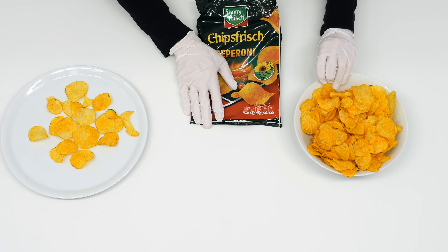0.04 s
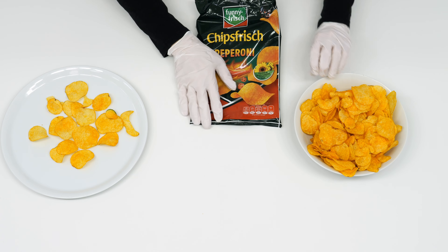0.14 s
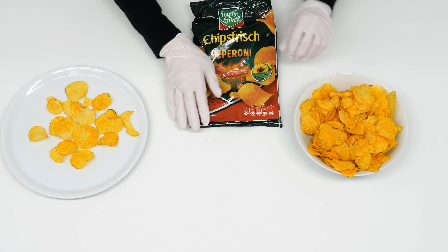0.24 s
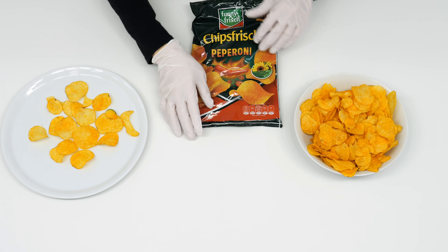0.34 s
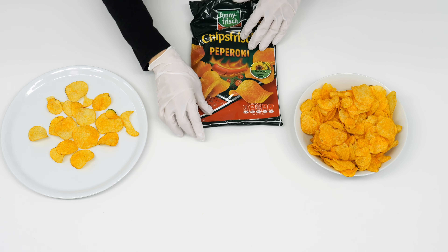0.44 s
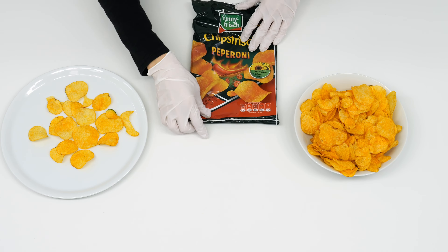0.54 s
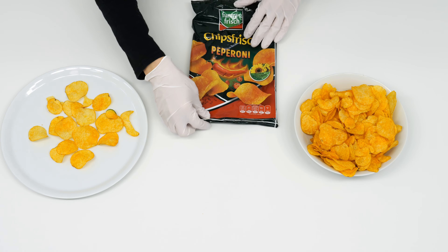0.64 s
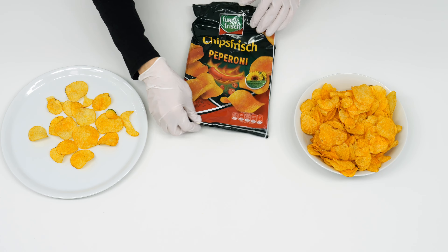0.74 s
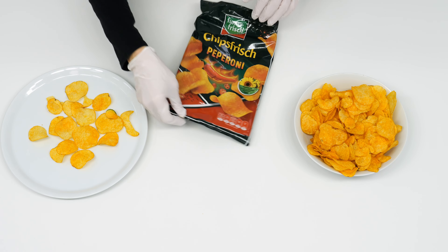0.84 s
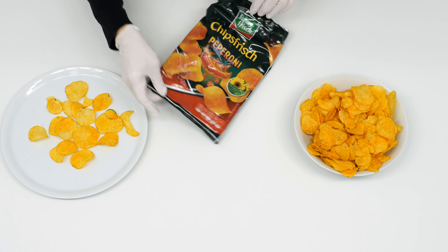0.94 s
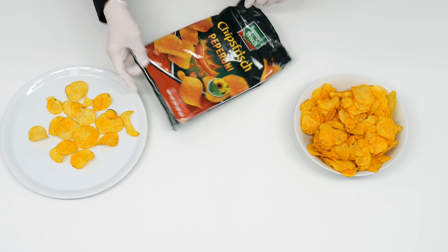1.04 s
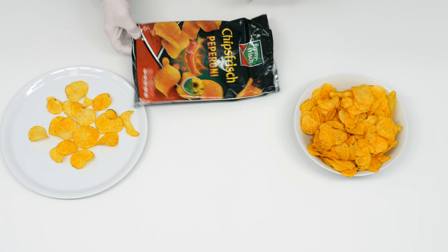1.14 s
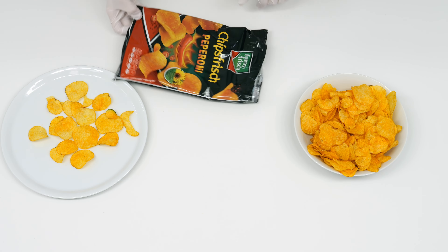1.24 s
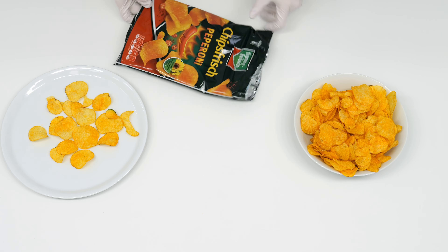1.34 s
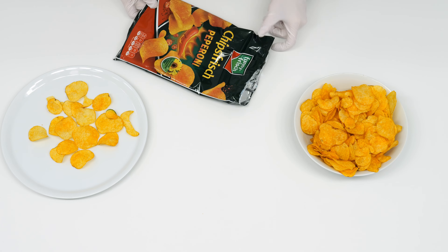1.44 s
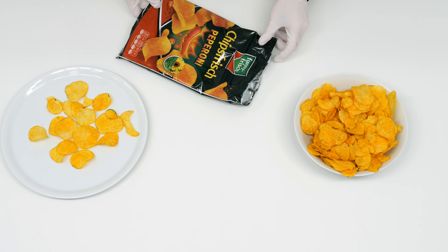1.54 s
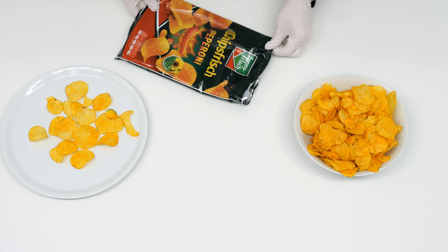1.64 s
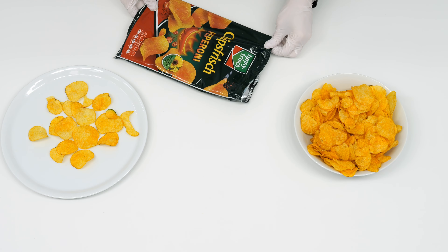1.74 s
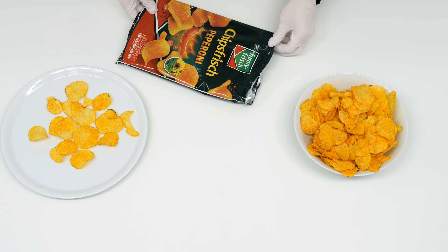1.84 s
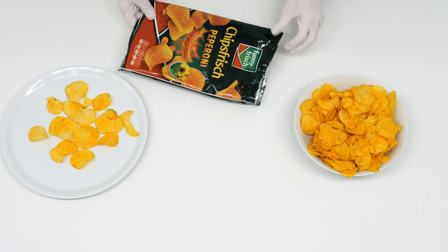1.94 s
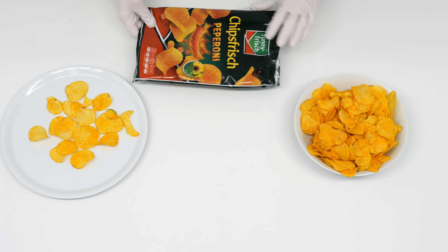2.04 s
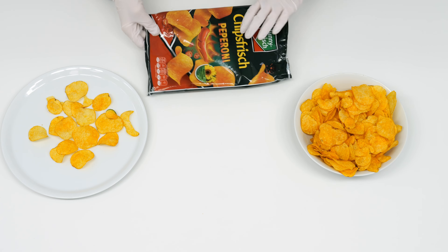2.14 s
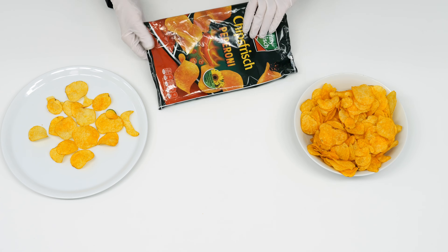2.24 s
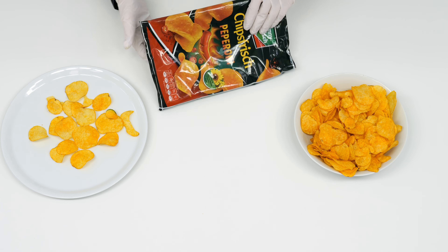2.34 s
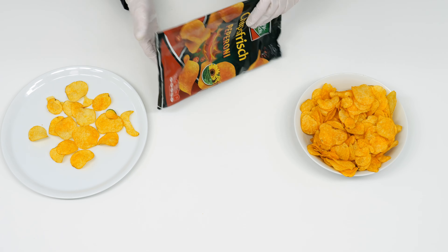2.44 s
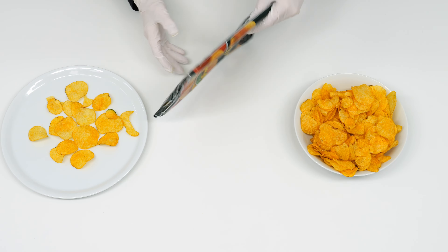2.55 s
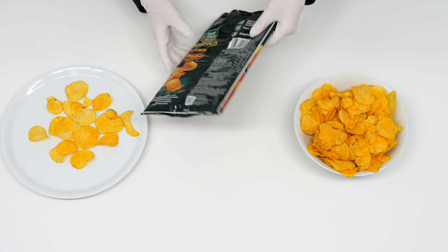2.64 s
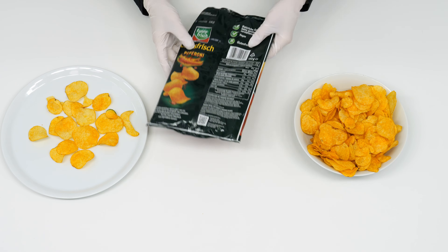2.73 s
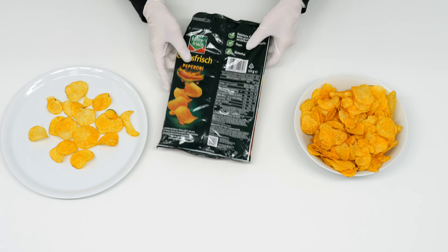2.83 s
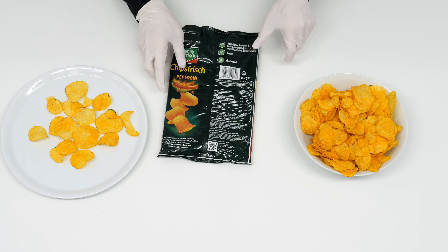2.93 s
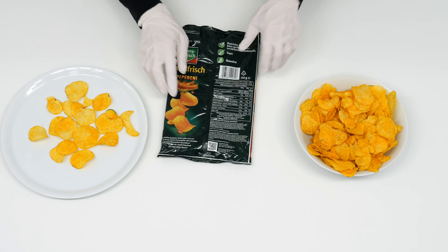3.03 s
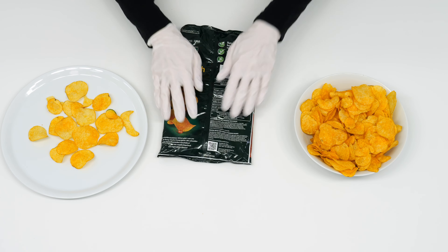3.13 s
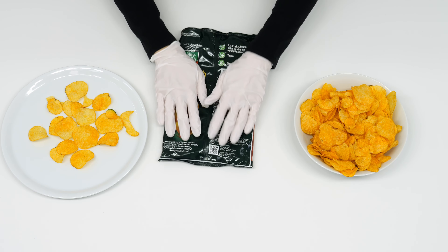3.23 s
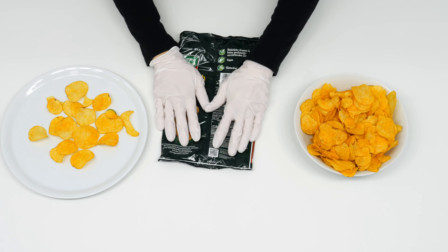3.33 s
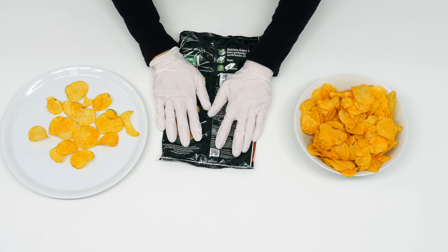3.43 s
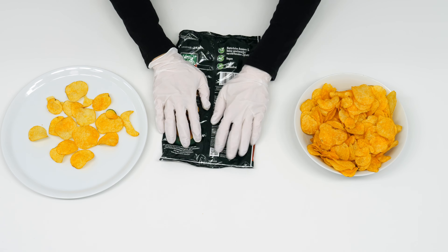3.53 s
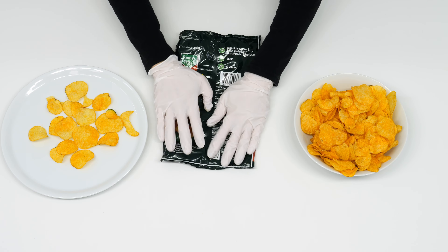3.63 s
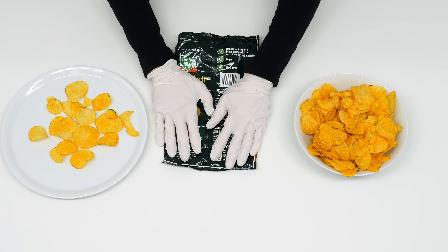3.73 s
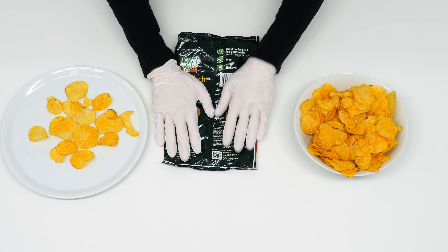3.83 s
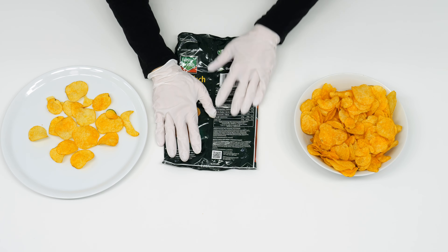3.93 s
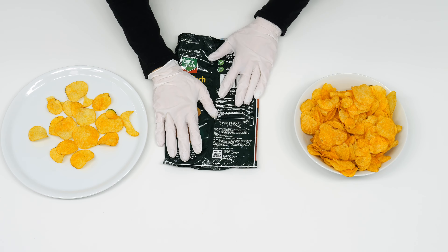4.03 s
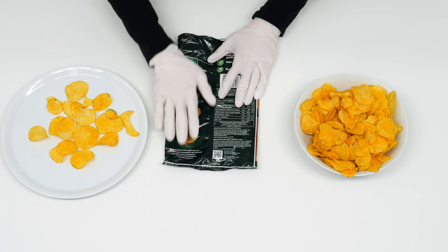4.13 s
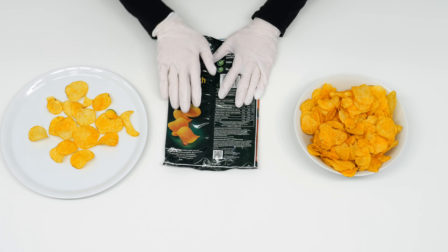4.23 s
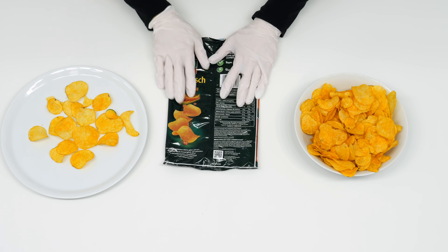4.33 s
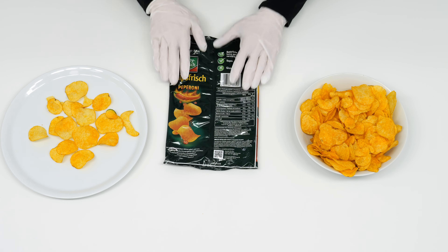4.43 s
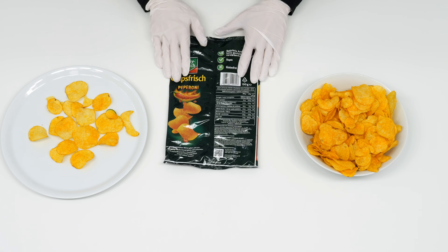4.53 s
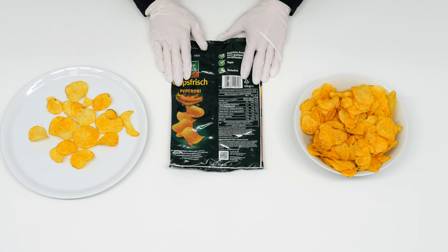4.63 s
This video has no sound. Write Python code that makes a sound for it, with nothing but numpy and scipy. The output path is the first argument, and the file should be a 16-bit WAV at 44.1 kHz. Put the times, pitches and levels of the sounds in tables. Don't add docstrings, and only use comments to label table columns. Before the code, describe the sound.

Thin plastic film crinkles close to a stereo pair of microphones indoors. First come loose, irregular snaps and dull knocks while the bag is handled and flipped, then a brief lull, then louder, brighter, tightly packed crackling with low table thuds as it is smoothed. The activity drops abruptly to near silence, with isolated tiny clicks from resting fingertips and a small late flurry.

```python
import sys
import numpy as np
from scipy import signal
from scipy.io import wavfile

SR = 44100
rng = np.random.default_rng(int(sys.argv[2]) if len(sys.argv) > 2 else 0)


def dump(signal):
    limited = np.clip(np.atleast_2d(signal).T, -1, 1)
    pcm = np.round(limited * 32767).astype(np.int16)
    wavfile.write(sys.argv[1], SR, pcm)


def boost(x):
    u = np.asarray(x, float) / 20
    return 10 ** u


N = 355446


def rms_one(x):
    return x / np.sqrt(np.mean(x ** 2) + 1e-20)


def peak_one(rows):
    return rows / (np.abs(rows).max(axis=1, keepdims=True) + 1e-12)


def wall_gain(db):
    return boost(np.array([[0], [0], [db]]))


def in_time(curve):
    s, value = np.transpose(curve)
    return np.interp(np.arange(N) / SR, s, value)


def at_hz(points, hz):
    table_hz, value = np.transpose(points)
    return np.interp(np.log(hz), np.log(table_hz), value)


def band(x, low_hz, high_hz):
    edges = [low_hz, min(high_hz, 0.45 * SR)]
    return signal.sosfilt(signal.butter(2, edges, "band", fs=SR, output="sos"), x)


def trail(x, lag_s):
    r = np.exp(-1 / (lag_s * SR))
    return signal.lfilter([1 - r], [1, -r], x)


def drift(rate_hz):
    r = np.exp(-80 * np.pi * rate_hz / SR)
    slow = signal.lfilter([1], [1, -2 * r, r * r], rng.standard_normal(N // 40 + 2002))[2000:]
    return np.interp(np.arange(N) / 40, np.arange(len(slow)), rms_one(slow))


BAND_EDGES_HZ = 30 * 2 ** np.arange(0, 9.6, 0.5)
# (frequency [Hz], likeness [0-1])
LEFT_RIGHT_LIKENESS = [(100, 0.76), (500, 0.29), (1500, 0.31), (4000, 0.11), (14000, 0.026)]


def noise_bands(size):
    white = rng.standard_normal((2, 2, size))
    for k, (low, high) in enumerate(zip(BAND_EDGES_HZ, BAND_EDGES_HZ[1:])):
        centre_hz = np.sqrt(low * high)
        mid, side = band(white[k % 2], low, high)
        alike = np.clip(at_hz(LEFT_RIGHT_LIKENESS, centre_hz), 0, 1)
        yield centre_hz, np.sqrt(1 + alike) * mid + np.sqrt(1 - alike) * side * [[1], [-1]]


def hiss(colour, patchy_db):
    noise = sum(boost(at_hz(colour, hz)) * x for hz, x in noise_bands(N))
    return rms_one(noise) * boost(patchy_db * drift(20))


def low_noise(low_hz, high_hz, side_share):
    mid, side = band(rng.standard_normal((2, N)), low_hz, high_hz)
    return mid + side_share * side * [[1], [-1]]


# (time [s], hold [s], crackle level [dB])
GRIPS = [(0.122, .05, -47), (0.186, .11, -45), (.367, .07, -39), (0.442, .15, -30), (.62, .2, -36),
         (0.881, .06, -36), (1.075, .04, -39), (1.182, .01, -37.5), (1.266, .02, -36), (1.399, .05, -34),
         (1.633, .02, -36), (1.662, .015, -26.5), (1.685, .005, -15), (1.877, .1, -31), (1.999, .06, -37),
         (2.178, .015, -36.5), (2.257, .055, -27.5), (2.398, .08, -36), (2.555, .07, -38),
         (2.736, .04, -42), (2.8, .2, -38.5), (3.238, .07, -34), (3.309, .04, -30.5), (3.356, .045, -24.5),
         (3.501, .1, -29), (3.667, .02, -20), (3.726, .015, -19), (3.837, .16, -34), (4.027, .03, -25),
         (4.132, .03, -32), (4.303, .02, -34), (4.329, .03, -29), (4.4, .15, -35), (4.58, .035, -29)]
# (time [s], hold [s], crackle level [dB])
STIRS = [(4.8, .2, -55), (5.406, .02, -46), (5.434, .03, -40), (5.499, .03, -46), (5.599, .03, -45),
         (5.693, .09, -51.5), (5.951, .03, -53), (6.474, .02, -54), (6.679, .02, -56), (7.142, .03, -39),
         (7.201, .07, -48), (7.47, .08, -39), (7.615, .09, -40.5), (7.739, .035, -38), (7.946, .04, -52)]
TIGHTEN_DB_PER_S, EASE_DB_PER_S, REST_DB = 898.5, 140, -72


def handling():
    t = np.arange(0, N + 64, 64) / SR
    s, hold, db = np.transpose(GRIPS + STIRS)[:, :, None]
    tightening_db = TIGHTEN_DB_PER_S * np.maximum(s - t, 0)
    easing_db = EASE_DB_PER_S * np.maximum(t - s - hold, 0)
    power = np.sum(boost(2 * (db - tightening_db - easing_db)), axis=0) + boost(2 * REST_DB)
    return np.interp(np.arange(N) / SR, t, 10 * np.log10(power))


# (frequency [Hz], density [dB per Hz])
QUIET_COLOUR = [(20, -12.5), (72, -10), (130, -17.5), (310, -23.5), (624, -20), (4180, -29), (9140, -35.5),
                (16000, -38.5)]


def quiet_room():
    return boost(-72.5) * hiss(QUIET_COLOUR, patchy_db=0.5)


# (frequency [Hz], time [s])
ECHO_T60 = [(150, 0.88), (500, 0.37), (1500, 0.43), (4000, 0.44), (9000, 0.24), (14000, 0.3)]
# (frequency [Hz], level [dB])
ECHO_COLOUR = [(150, -3), (500, 2), (1500, 0), (4000, -4), (9000, -2.5), (14000, -15)]


def room(x, first_s=0.0026, build_s=0.0015):
    t = np.arange(int(0.7 * SR)) / SR
    echoes = 0
    for hz, noise in noise_bands(len(t)):
        echoes = echoes + boost(at_hz(ECHO_COLOUR, hz) - 60 * t / at_hz(ECHO_T60, hz)) * noise
    echoes = echoes * np.clip((t - first_s) / build_s, 0, 1)
    echoes = echoes / np.sqrt(np.sum(echoes ** 2) / 2)
    return signal.fftconvolve(x, echoes, axes=1)[:, :N]


def rumble():
    shaking = band(low_noise(14, 45, side_share=0.63), 10, 55)
    effort_db = trail(handling() - REST_DB, lag_s=0.08) + REST_DB + 40
    return boost(-73 + 0.89 * effort_db + 3.7 * drift(5.5)) * rms_one(shaking)


# (time [s], peak level [dB])
PRESSES = [
    (1.235, -49.5),
    (1.689, -62),
    (2.918, -52.5),
    (3.392, -47),
    (3.678, -46.5),
    (3.728, -38.5),
    (4.04, -56),
    (4.327, -66),
    (4.598, -60),
    (7.783, -60),
]
# (frequency [Hz], level [dB], time to fade 60 dB [s])
TABLE_MODES = [(71, 4, 0.2), (123.1, 3, 0.3), (137, -2, 0.25), (236, -6, 0.1)]


def table():
    weight, out = np.zeros(N), np.zeros((2, N))
    for s, db in PRESSES:
        fingers_s = s + rng.uniform(0.03, 0.045)
        weight[int(s * SR)] = boost(db)
        weight[int(fingers_s * SR)] = boost(db - 5)
    settling = rng.standard_normal(6000) * 0.023 * np.exp(-np.arange(6000) / SR / 0.05)
    weight = weight + signal.fftconvolve(weight, settling)[:N]
    push = boost(-38) * band(np.convolve(weight, np.hanning(150))[:N], 65, 500)
    push = push + boost(handling() - 69.5) * low_noise(50, 260, side_share=0.4)
    for hz, db, t60 in TABLE_MODES:
        r, w = boost(-60 / (t60 * SR)), 2 * np.pi * hz / SR
        out += boost(db) * signal.lfilter([0, np.sin(w)], [1, -2 * r * np.cos(w), r * r], push + 1e-18)
    return out


# (time [s], peak level [dB], centre [Hz])
BUMPS = [(1.109, -26.5, 740), (1.172, -27.5, 665), (1.234, -33.5, 264), (1.391, -33.5, 488),
         (1.687, -21.5, 507), (2.182, -43, 200), (2.26, -34, 670), (2.464, -40, 458), (2.912, -37, 304),
         (5.154, -58, 260.4), (5.944, -53, 702), (6.66, -36, 680), (6.886, -52, 483)]


def bumps():
    out, t = np.zeros(N + 2000), np.arange(2000) / SR
    for s, db, hz in BUMPS:
        puff = band(rng.standard_normal(2000) * t * np.exp(-t * hz), hz / 1.5, hz * 1.6)
        start = int(s * SR)
        out[start:start + 2000] += boost(db) * puff / np.abs(puff).max()
    return out[:N]


# (time [s], hiss level [dB])
SLIDE = [(0, -73.5), (1.9, -51), (3.0, -67), (3.2, -65.5), (4.3, -66.5), (4.7, -51), (5.0, -54.5),
         (5.3, -54.5), (5.4, -65), (5.9, -60), (6.15, -63.5), (6.25, -95), (6.33, -88), (6.37, -57),
         (6.6, -66), (6.82, -72), (6.9, -62), (7.05, -71.5), (7.12, -58), (8.06, -69.5)]
# (frequency [Hz], density [dB per Hz])
SLIDE_COLOUR = [(180, -41), (300, -27.5), (828, -16), (1210, 1), (1970, 3.5), (4670, 5.5), (11100, -1),
                (16000, -3)]


def glove_slide():
    return boost(in_time(SLIDE)) * hiss(SLIDE_COLOUR, patchy_db=2)


# (time [s], slackness [0-1])
SLACK = [(0, 0.88), (.45, 0.85), (.8, 0.26), (1.2, 1), (1.7, 0.41), (2.2, 0.62), (2.7, 0.93), (3.28, 0.99),
         (3.5, 0.01), (3.75, 0.05), (4.3, 0.6), (4.7, 0.04), (6, 0.58), (7, 0.32), (8.06, 0.67)]


def body():
    grip = trail(boost(handling()), lag_s=0.01)
    level_db = -23.5 + 9.3 * (in_time(SLACK) - 0.99) + 3.5 * drift(25)
    return grip * boost(level_db) * rms_one(low_noise(130, 520, side_share=0.45))


def slack_bass(wash):
    bass_db, split_hz = 14 * (np.clip(in_time(SLACK), 0, 1) - 0.75), 979
    return band(wash, split_hz, 28000) + boost(bass_db) * band(wash, 150, split_hz)


# (frequency [Hz], density [dB per Hz])
RUSTLE_COLOUR = [(180, -30), (400, -10), (900, 2.5), (1600, -3), (3500, 1.4), (7000, -10), (11000, -8.5),
                 (16000, -15.5)]


def rustle():
    level_db = handling()
    easing_db = np.clip(np.gradient(level_db) * SR / 18, -7, 0)
    grain_db = 5 * drift(140)
    return boost(level_db + easing_db - 9.5 + grain_db) * slack_bass(hiss(RUSTLE_COLOUR, patchy_db=4))


def snaps(s, db, hz, crack_db, thud_db, cycles, lag_spread, pan_db, rough=1.05):
    size = 256
    chance = rng.standard_normal((len(s), 4))
    noise = rng.standard_normal((len(s), 5, size))
    t = np.arange(size) / SR
    hz = hz[:, None]
    decay_s = cycles * np.exp(0.25 * chance[:, :1]) / hz
    rise_s = 0.00014 * np.exp(0.88 * chance[:, 1:2])
    fade = np.exp(-t / decay_s) * (1 - np.exp(-t / rise_s))
    tone = np.sin(2 * np.pi * hz * t + chance[:, 1:2])
    thud = peak_one(band(noise[:, 4] * np.exp(-t / 0.0008), 680, 1900))
    crack_fade = np.exp(-t / 0.00059) * (1 - np.exp(-t / 0.00015))
    out = np.zeros((3, N + 2 * size))
    for row, (sign, focus) in enumerate([(1, 1), (-1, 1), (0, 0.25)]):
        own = 0.5 * noise[:, row] + focus * noise[:, 3]
        roughness = rough if sign else 1.35
        ring = fade * (focus * tone + roughness * band(own, 2400, 7350))
        crack = band(own * crack_fade, 5000, 12760)
        shape = peak_one(ring) + boost(crack_db)[:, None] * peak_one(crack) + boost(thud_db)[:, None] * thud
        shape = peak_one(shape) * boost(db + sign * pan_db * (chance[:, 2] + 0.12))[:, None]
        lag = sign * lag_spread * chance[:, 3]
        start = np.round((s + 0.001) * SR + lag).astype(int) + size - 4
        place = (start[:, None] + np.arange(size)).ravel()
        out[row] += np.bincount(place, shape.ravel(), out.shape[1])[:out.shape[1]]
    return out[:, size:size + N]


def foil(s, db, hz, crack_db, spread):
    octave = np.log2(hz / 3000)
    slack = np.interp(s, *np.transpose(SLACK))
    crack_db = crack_db + 4 * octave + 22 * spread
    thud_db = -13 + 8.4 * (slack - 0.6) - 4.8 * octave - 2 * spread
    return snaps(s, db, hz, crack_db, thud_db, cycles=2.8, lag_spread=1.3, pan_db=3)


def crackle(count=2800):
    level_db, slack = handling(), in_time(SLACK)
    busy = np.cumsum(boost(0.35 * level_db))
    chance = rng.random((count, 4))
    at = np.interp(chance[:, 0], busy / busy[-1], np.arange(N)).astype(int)
    size_db = 3.2 * np.minimum(-np.log(chance[:, 1] + 1e-9), 2.5) + 2 * drift(40)[at]
    size_db = size_db + np.clip(np.gradient(level_db)[at] * SR / 18, -11, 0)
    hz = 4500 * 2 ** (-1.8 * np.clip(slack[at], 0, 1) + 2.1 * (chance[:, 2] - 0.5))
    db = 0.86 * level_db[at] + size_db - 6.5
    return foil(at / SR, db, np.maximum(hz, 850), -7 - 8 * slack[at], chance[:, 3] - 0.5)


# (time [s], peak level [dB], ring [Hz])
TICKS_TURNING = [(0.052, -50, 4370), (0.066, -45, 5000), (0.232, -40, 2586), (0.326, -32, 2337),
                 (0.372, -33, 5080), (0.388, -25, 1260), (0.404, -20, 1800), (0.438, -19, 1590),
                 (0.533, -16, 4080), (0.548, -18.5, 5000), (0.644, -20, 1815), (0.699, -25, 2370),
                 (0.741, -22, 2630), (0.765, -35, 2090), (0.861, -17.5, 5400), (0.949, -22, 1100),
                 (1.059, -30.5, 1230), (1.09, -25, 1380), (1.26, -26, 1950), (1.322, -34, 1150),
                 (1.334, -31, 3010), (1.38, -15, 4750), (1.501, -31.5, 2796), (1.866, -19.5, 1920),
                 (1.89, -27, 3620), (2.005, -24, 7040), (2.098, -24, 2900), (2.153, -32, 2070),
                 (2.175, -22.5, 2440), (2.181, -22, 2280), (2.262, -17, 2045), (2.31, -18, 1820),
                 (2.316, -17.5, 4380), (2.357, -25, 6800), (2.411, -22, 3200), (2.539, -24, 1320),
                 (2.545, -19.5, 5010), (2.582, -27, 5680), (2.621, -20.5, 3500), (2.732, -28, 3700),
                 (2.762, -30, 910), (2.796, -28, 880), (2.807, -26.5, 890), (2.819, -27, 2580),
                 (2.847, -17, 2570), (2.862, -45, 940), (2.939, -34, 2780), (2.967, -30.5, 4250),
                 (2.972, -46, 1370), (2.988, -27, 2150), (3.034, -41, 1350)]
# (time [s], peak level [dB], ring [Hz])
TICKS_PRESSING = [(3.253, -19.5, 4180), (3.32, -24, 2970), (3.436, -23, 2640), (3.495, -12, 4480),
                  (3.525, -20.5, 4400), (3.541, -12, 8960), (3.552, -18.5, 2100), (3.584, -7, 2580),
                  (3.607, -16, 6750), (3.683, -5, 3600), (3.733, -4, 3930), (3.756, -18, 3450),
                  (3.856, -14, 2940), (3.962, -30, 3880), (4.005, -21.5, 3650), (4.017, -14, 2890),
                  (4.125, -18, 4370), (4.139, -15, 6290), (4.183, -23, 4400), (4.188, -28.5, 5210),
                  (4.209, -30.5, 1850), (4.231, -27, 3010), (4.263, -33.5, 3270), (4.282, -48, 2580),
                  (4.302, -32, 5340), (4.332, -10, 5200), (4.353, -14, 1300), (4.374, -15, 4550),
                  (4.442, -17, 3840), (4.458, -17, 4130), (4.483, -19, 3920), (4.522, -32, 3420),
                  (4.619, -12.5, 4080), (4.653, -20.5, 2170), (4.663, -24.5, 1410), (4.696, -28.5, 2330),
                  (4.723, -37, 1590), (4.734, -38, 1410)]
# (time [s], peak level [dB], ring [Hz])
TICKS_RESTING = [(4.774, -36, 2200), (4.989, -43, 1417), (5.448, -29, 6240), (5.499, -23, 3550),
                 (5.606, -26.5, 2890), (5.632, -36, 2710), (5.648, -29.5, 6630), (5.761, -35, 2130),
                 (5.815, -44, 2070), (5.856, -48, 4630), (6.094, -49.5, 2310), (6.223, -56.5, 8360),
                 (6.243, -64, 1340), (6.268, -67.5, 4150), (6.324, -54, 4780), (6.33, -52, 4520),
                 (6.527, -36.5, 3440), (6.572, -37, 2890), (6.626, -42, 2180), (6.831, -46, 2385),
                 (6.849, -39, 4260), (6.962, -43, 6370), (7.144, -23, 4040), (7.372, -39, 4230),
                 (7.38, -41, 1200), (7.441, -32, 2240), (7.475, -22, 3100), (7.56, -27, 1400),
                 (7.57, -25, 5990), (7.614, -37, 5680), (7.712, -30, 3300), (7.737, -25, 4180),
                 (7.763, -24, 4010), (7.864, -35, 2246), (7.876, -29.5, 5750), (7.912, -43, 3680),
                 (7.987, -44, 2760)]


def ticks():
    s, db, hz = np.transpose(list(TICKS_TURNING) + list(TICKS_PRESSING) + list(TICKS_RESTING))
    return foil(s, db - 0.8, hz, -11, 0 * s) * wall_gain(-4)


# (time [s], peak level [dB], ring [Hz])
POPS = [
    (1.66, -4, 12500),
    (1.717, -17.5, 13500),
    (2.05, -16, 10700),
    (2.465, -14, 9800),
    (3.661, -14.5, 9000),
    (3.665, -11.5, 2430),
    (3.848, -18.5, 3100),
    (3.866, -10, 9500),
    (3.906, -20, 2700),
    (1.689, -3, 2340),
]


def pops():
    s, db, hz = np.transpose(POPS)
    return snaps(s, db, hz, -8 + 0 * s, -16 + 0 * s, cycles=2.9, lag_spread=0.45, pan_db=0.5, rough=0.4)


# (time [s], peak level [dB], ring [Hz])
LIFTING_AND_TURNING = [(0.191, -30, 2130), (0.215, -20.5, 3323), (0.279, -23.5, 3750), (0.336, -24.5, 7040),
                       (0.356, -16, 2060), (0.409, -28.5, 1790), (0.45, -17.5, 1750), (0.471, -21.5, 1995),
                       (0.525, -15, 4710), (0.506, -23.5, 2200), (0.585, -15, 6180), (0.604, -15, 4060),
                       (0.662, -13.5, 4200), (0.692, -17.5, 2220), (0.739, -25, 2500), (0.833, -10.5, 3915),
                       (0.858, -32, 3750), (0.895, -24.5, 3030), (0.91, -13.5, 4200), (0.997, -16.5, 4400),
                       (1.074, -23.5, 3030), (1.111, -23, 5630), (1.173, -20.5, 2400), (1.193, -21.5, 4266),
                       (1.263, -16.5, 1723), (1.288, -20, 5600), (1.385, -24.5, 2000), (1.394, -13, 2837),
                       (1.44, -17.5, 3018), (1.518, -19.5, 2250),
                       (1.637, -19.5, 2120), (1.661, -9, 2000), (1.684, 0.5, 2130), (1.697, -4, 1840),
           (1.704, -2.5, 4340), (1.805, -18, 2050), (1.903, -11, 1970), (1.926, -19.5, 2100),
           (1.944, -22.5, 2000), (1.992, -20, 2700), (2.05, -18, 1700), (2.09, -22, 2580),
           (2.192, -16, 2270), (2.265, -22.5, 2070), (2.282, -17, 6200), (2.288, -11.5, 2700),
           (2.31, -26, 4380), (2.429, -14, 3180), (2.465, -16, 5000), (2.552, -22.5, 3500),
           (2.571, -17, 8600), (2.618, -26, 2780), (2.634, -17, 5980), (2.701, -26, 4060),
           (2.715, -25, 2600), (2.769, -26, 2110), (2.835, -17, 2700), (2.914, -20.5, 4340),
           (2.969, -41, 1760)]
# (time [s], peak level [dB], ring [Hz])
SMOOTHING = [(3.229, -23.5, 2230), (3.242, -23, 4470), (3.319, -11.5, 2740), (3.353, -5.5, 4100),
             (3.397, -2.5, 3140), (3.485, -14.5, 4400), (3.508, -17.5, 4650), (3.546, -20.5, 2384),
             (3.603, -11, 3100), (3.652, -8, 3380), (3.669, -2.5, 2250), (3.678, -8.5, 3030),
             (3.723, 3, 3080), (3.74, -6.5, 2840), (3.832, -13, 3205), (3.864, -11.5, 3315),
             (3.891, -8.5, 3100), (3.915, -18, 2960), (3.947, -14, 3810), (3.977, -15, 4900),
             (4.027, -14, 3420), (4.039, -5.5, 5630), (4.12, -11.5, 4480), (4.152, -6.5, 3220),
             (4.324, -9.5, 4600), (4.347, -13.5, 3640), (4.42, -8.5, 4260), (4.472, -12.5, 4150),
             (4.545, -14, 3820), (4.597, -6.5, 3030)]
# (time [s], peak level [dB], ring [Hz])
BUCKLING = [
    (1.675, -11, 6060),
    (1.686, -2.5, 1685),
]
# (time [s], peak level [dB], ring [Hz], crack share [dB])
SETTLING = [(4.831, -29.5, 4370, -29), (4.863, -37, 2340, -19), (4.888, -31.5, 1490, -24),
            (4.927, -30.5, 5500, -16), (4.967, -33, 1410, -15), (5.164, -44, 1310, -17),
            (5.323, -35.5, 2040, -24), (5.403, -28, 3960, -14), (5.437, -25.5, 4200, -2),
            (5.487, -15, 3670, -22), (5.517, -30, 1480, -9), (5.59, -25, 3000, -25),
            (5.6, -20.5, 4370, -23), (5.685, -31, 2400, -12), (5.698, -29, 2430, -32),
            (5.766, -33.5, 3140, -19), (5.851, -32.5, 5080, -1), (5.894, -34, 3000, 8),
            (5.944, -32.5, 2430, -27), (5.965, -35.5, 3480, -10), (6.349, -24, 3600, -2.5),
            (6.401, -29.5, 3470, -10), (6.463, -25, 3360, -17), (6.486, -38, 3280, -23),
            (6.547, -36, 8260, -4), (6.66, -25, 3300, -14), (6.758, -40.5, 5930, -23.5),
            (6.837, -32.5, 5840, -24), (6.885, -20.5, 5770, -10), (6.898, -23.5, 4260, -7),
            (7.111, -21, 3580, -4), (7.157, -22.5, 3230, -16), (7.163, -21.5, 4530, -9),
         (7.22, -24, 2235, -31), (7.258, -23, 4000, -9), (7.279, -40, 1910, -14), (7.362, -42, 5000, -30),
         (7.455, -24.5, 3230, -10), (7.467, -25.5, 3400, -20), (7.478, -29, 4210, -14),
         (7.492, -17, 3880, -10.5), (7.527, -28.5, 3040, -22), (7.54, -25.5, 5090, -20.5),
         (7.544, -28, 4550, -25), (7.573, -33, 2410, -18), (7.627, -21, 3780, -9), (7.638, -21.5, 4570, -7),
         (7.653, -12, 4330, -0.5), (7.684, -17, 2230, -8), (7.739, -31, 4380, -12),
         (7.745, -18.5, 3350, -17), (7.758, -21, 3450, -25), (7.8, -26.5, 4150, -16),
         (7.9016, -12, 4080, -5), (7.97, -28.5, 5300, -5), (8.025, -28.5, 3420, -24)]


def creases(count=4):
    s, db, hz = np.transpose(LIFTING_AND_TURNING + SMOOTHING + BUCKLING)
    leaders = foil(s, db - 0.6, hz, -6.5, 0 * s) * wall_gain(-3)

    delay, weaker, pitch, spread = rng.random((len(s), count, 4)).transpose(2, 1, 0)
    after = np.clip(s + 0.019 * (delay - 0.15), 0, N / SR).ravel()
    reach_db = np.minimum(db - 10, handling()[(s * SR).astype(int)] + 10.1)
    swarm_db = (reach_db - 1.4 * weaker).ravel()
    swarm_hz = (hz * 2 ** (pitch - 0.6)).ravel()
    swarm = foil(after, swarm_db, swarm_hz, -6, spread.ravel() - 0.5)

    s, db, hz, crack_db = np.transpose(SETTLING)
    lone = snaps(s, db + 0.3, hz, crack_db + 6.5, -19 + 0 * s,
                 cycles=2.55, lag_spread=0.67, pan_db=3.5, rough=0.9)
    return leaders + swarm + lone * wall_gain(-2.5)


def scene():
    bag = band(creases() + ticks() + crackle(), 220, 28000)
    bag = bag + bumps() * wall_gain(-7) + pops()
    near = bag[:2] + rustle() + body() + glove_slide()
    return near + boost(-9) * room(bag[2:]) + table() + rumble() + quiet_room()


def roll_off(x):
    return signal.sosfilt(signal.butter(12, 16450, fs=SR, output="sos"), x)


def record(dry):
    low_pass = signal.cheby2(10, 40, 16700, fs=SR, output="sos")
    mix = signal.sosfilt(low_pass, np.clip(dry, -1, 1))
    return roll_off(mix)


dry = scene()
out = record(dry)
dump(out)
```